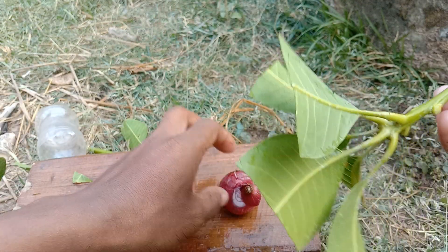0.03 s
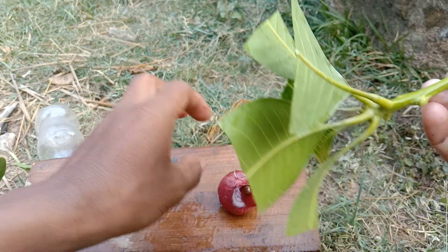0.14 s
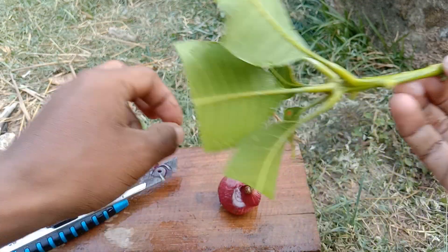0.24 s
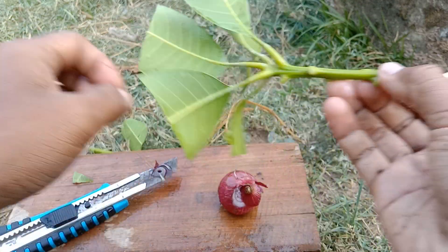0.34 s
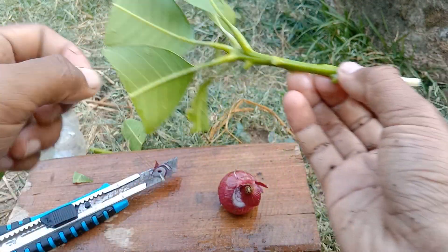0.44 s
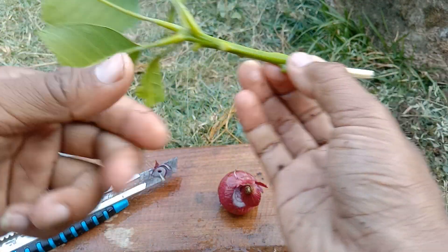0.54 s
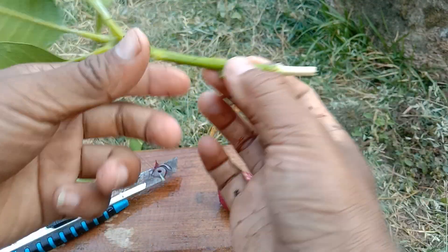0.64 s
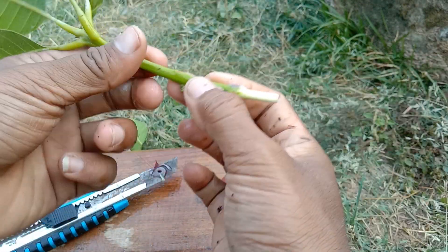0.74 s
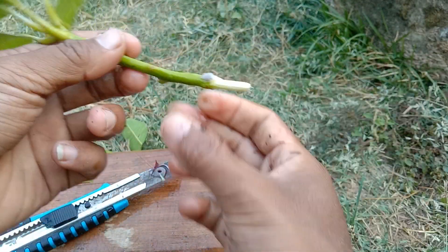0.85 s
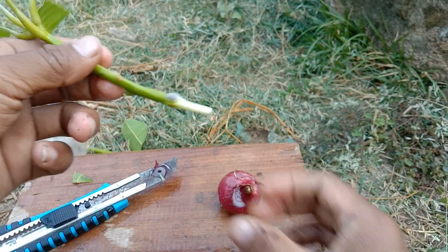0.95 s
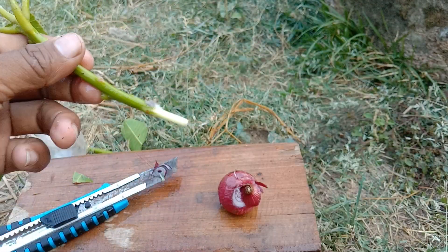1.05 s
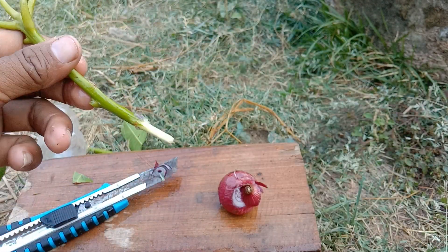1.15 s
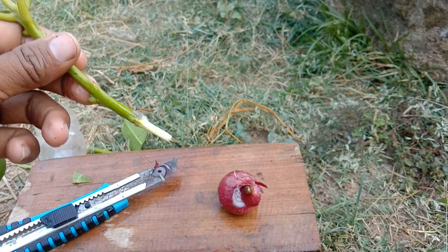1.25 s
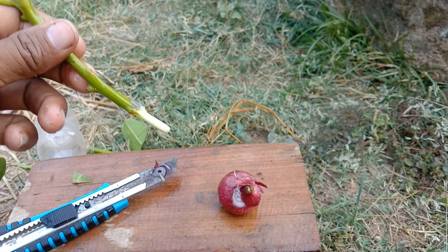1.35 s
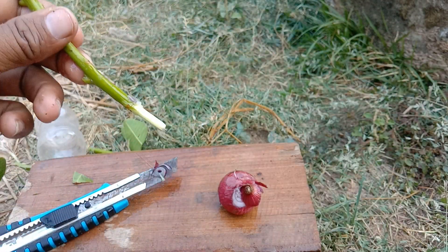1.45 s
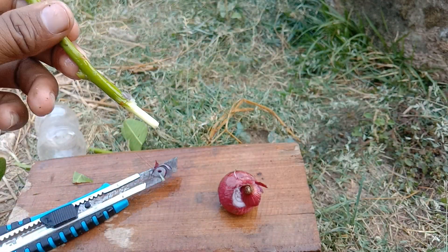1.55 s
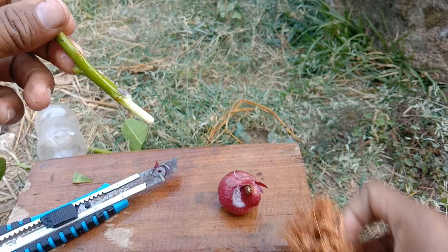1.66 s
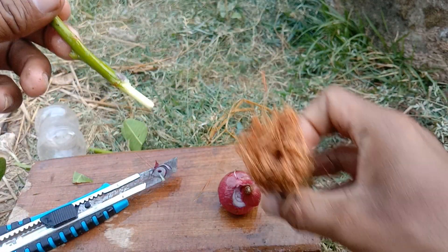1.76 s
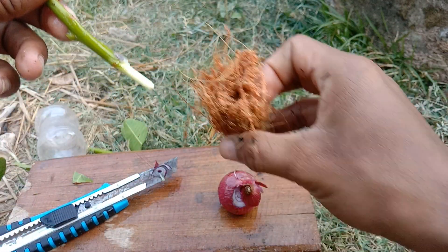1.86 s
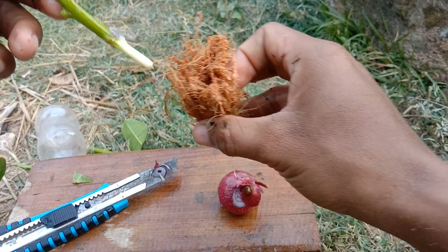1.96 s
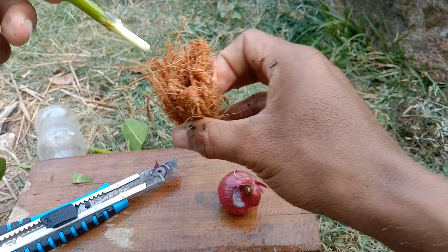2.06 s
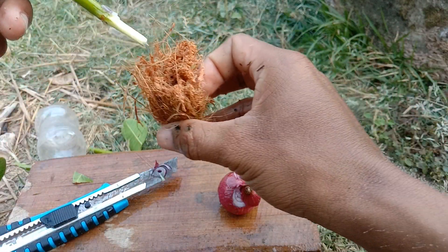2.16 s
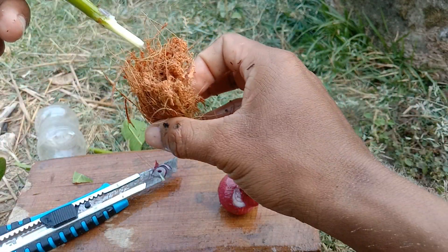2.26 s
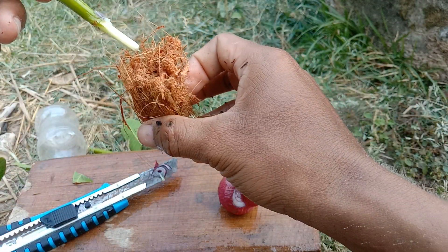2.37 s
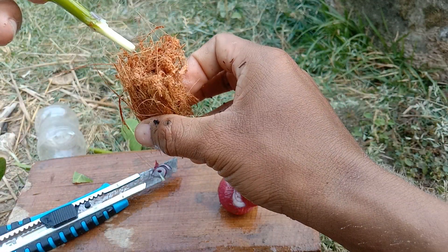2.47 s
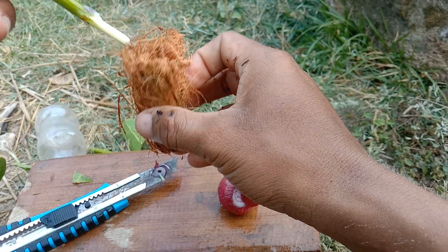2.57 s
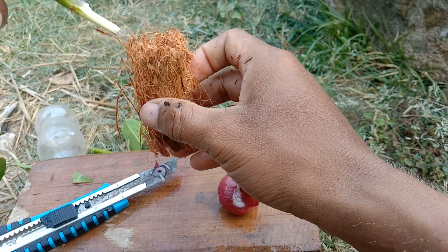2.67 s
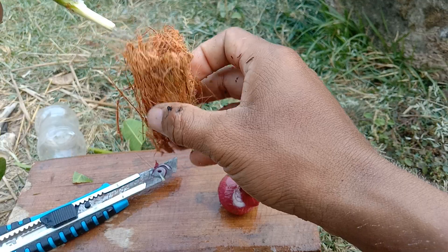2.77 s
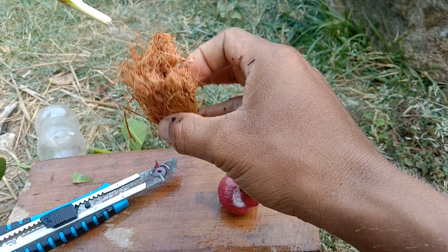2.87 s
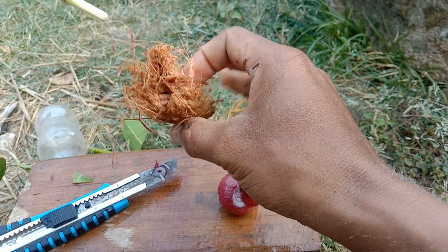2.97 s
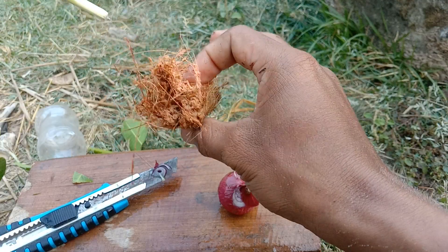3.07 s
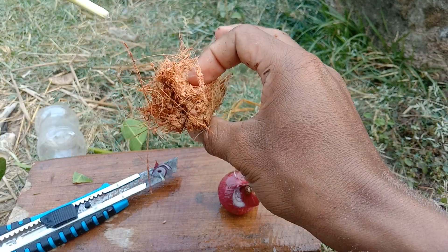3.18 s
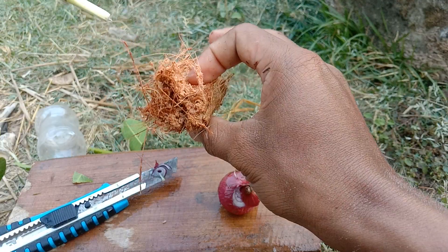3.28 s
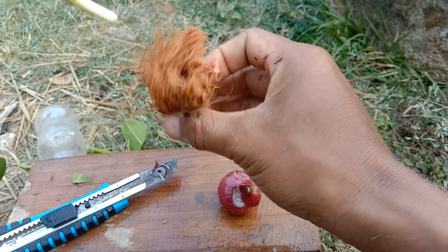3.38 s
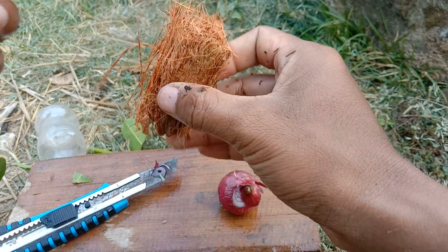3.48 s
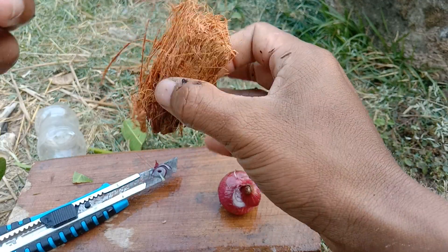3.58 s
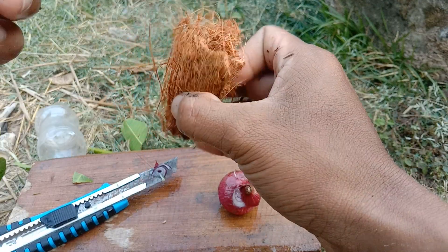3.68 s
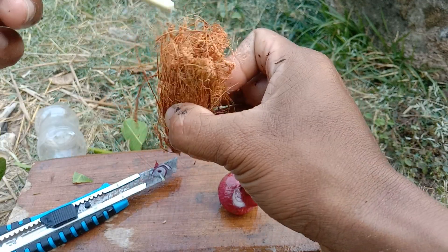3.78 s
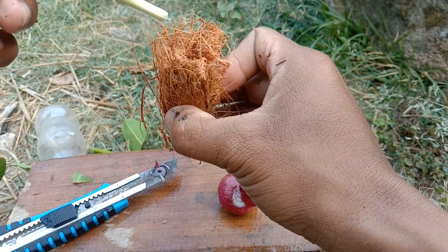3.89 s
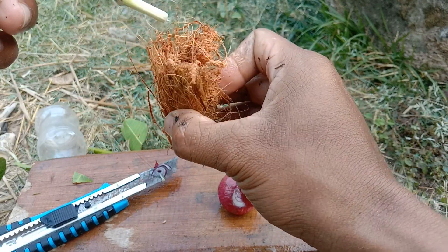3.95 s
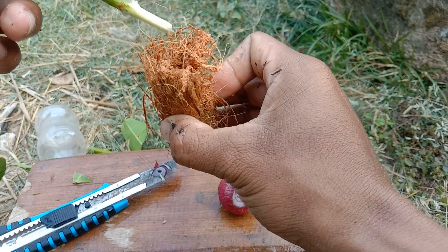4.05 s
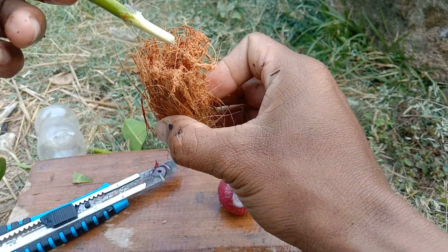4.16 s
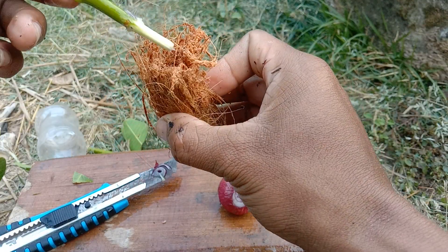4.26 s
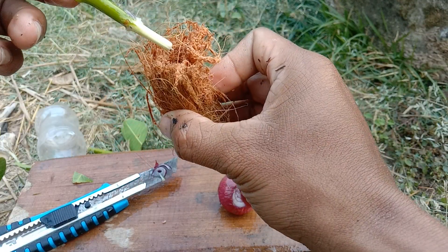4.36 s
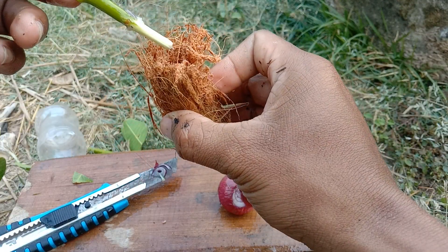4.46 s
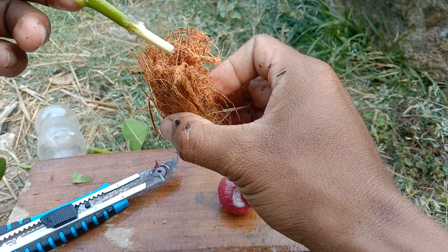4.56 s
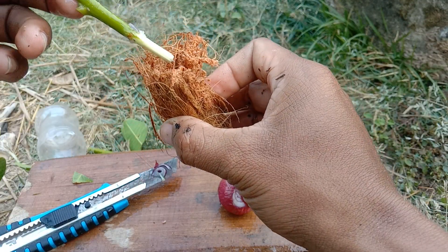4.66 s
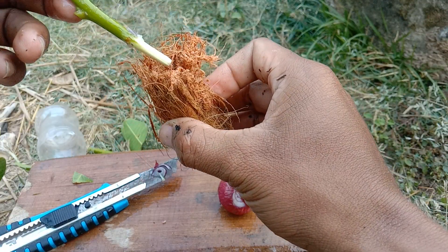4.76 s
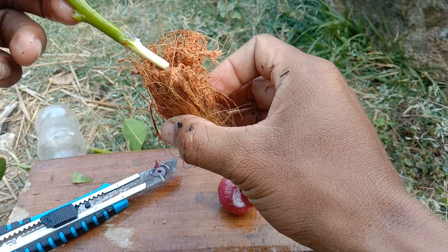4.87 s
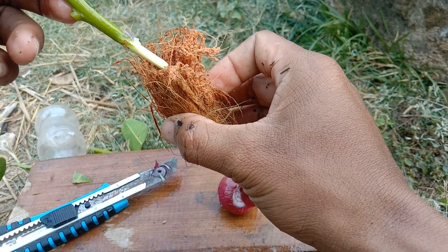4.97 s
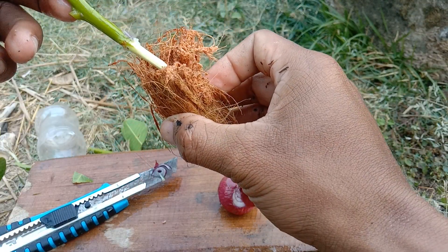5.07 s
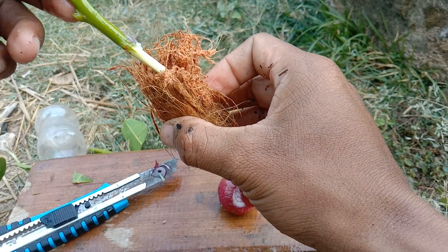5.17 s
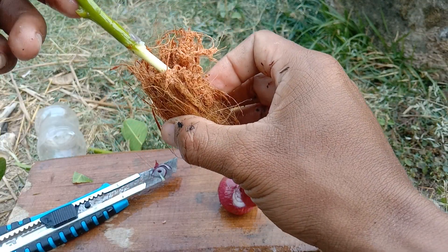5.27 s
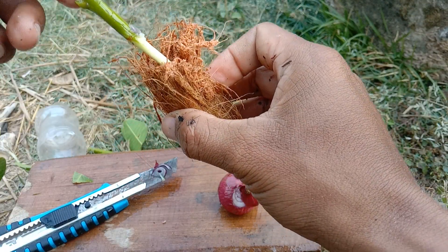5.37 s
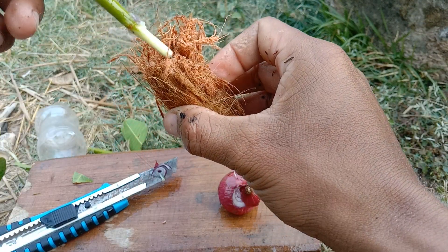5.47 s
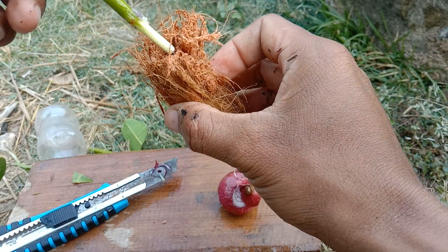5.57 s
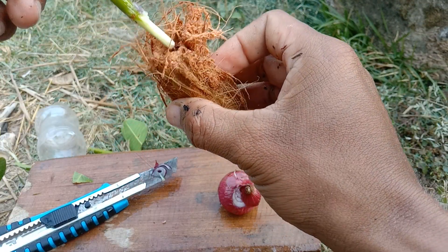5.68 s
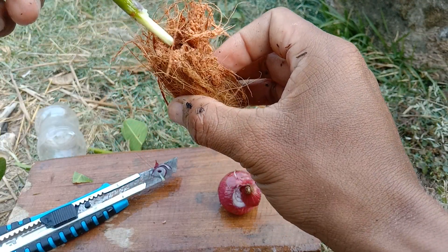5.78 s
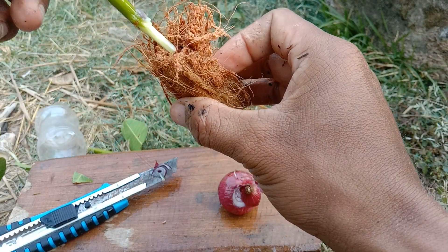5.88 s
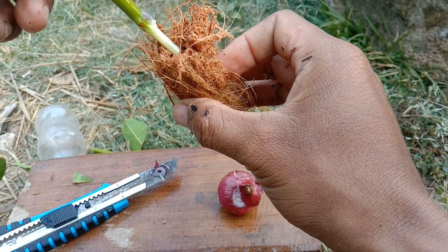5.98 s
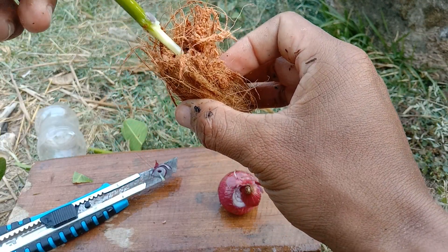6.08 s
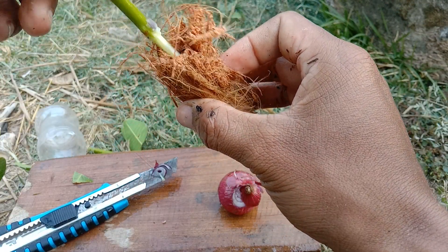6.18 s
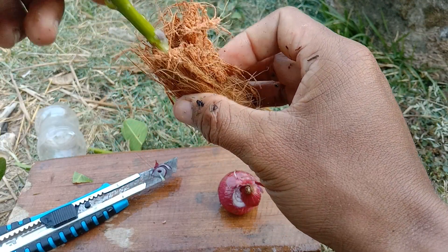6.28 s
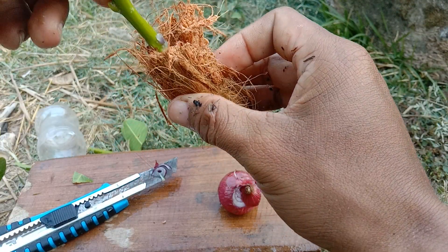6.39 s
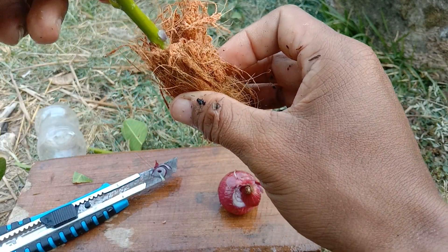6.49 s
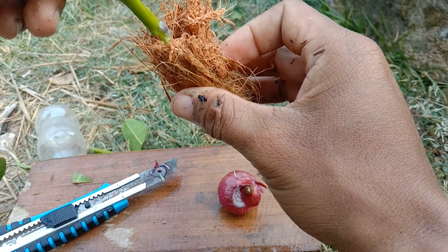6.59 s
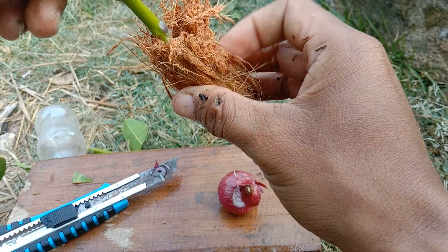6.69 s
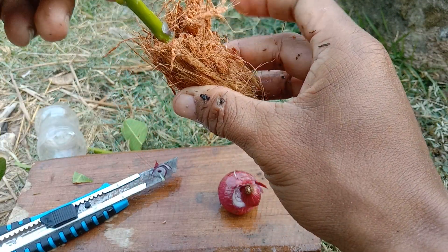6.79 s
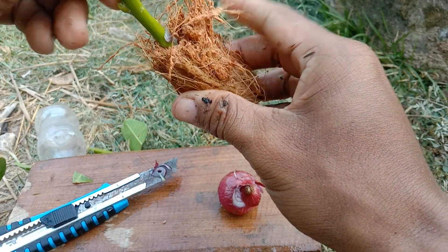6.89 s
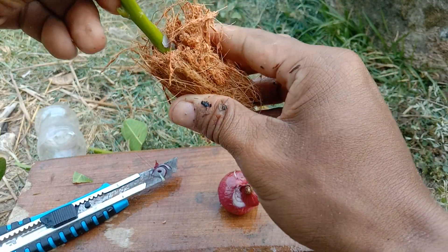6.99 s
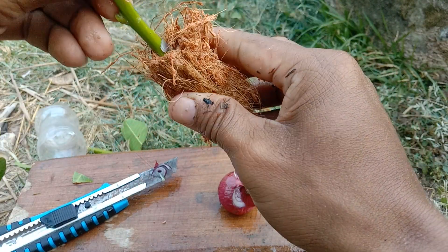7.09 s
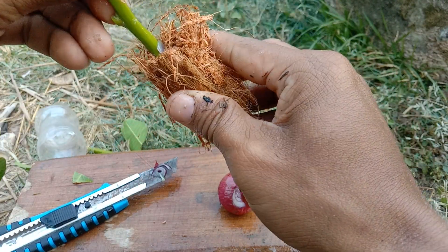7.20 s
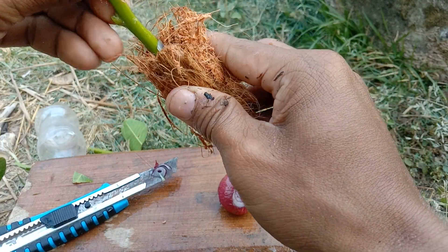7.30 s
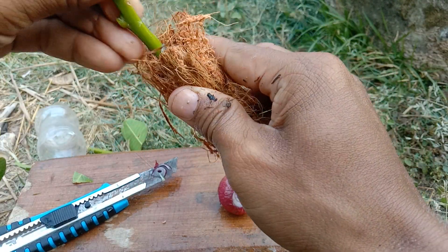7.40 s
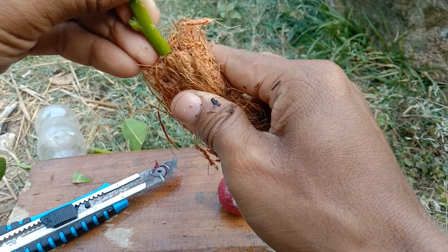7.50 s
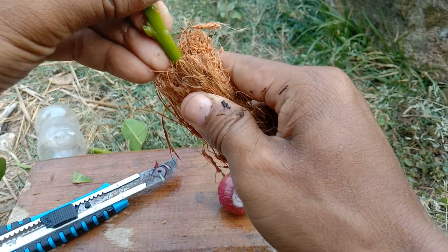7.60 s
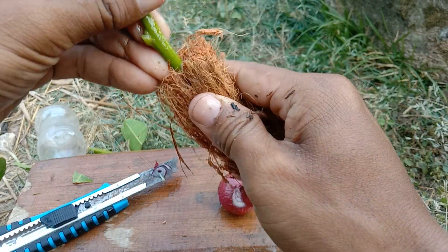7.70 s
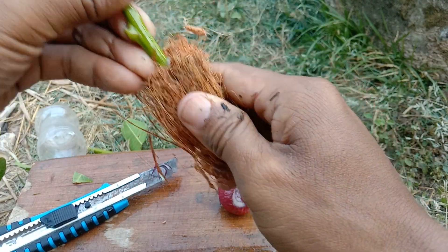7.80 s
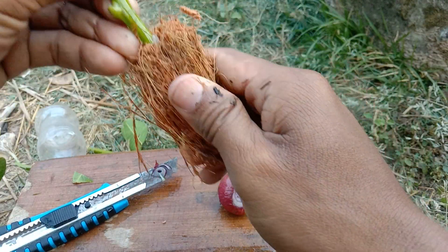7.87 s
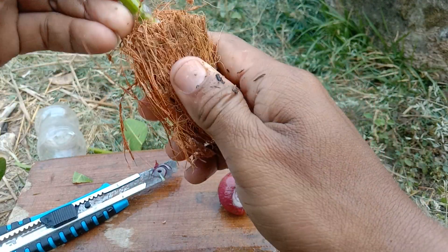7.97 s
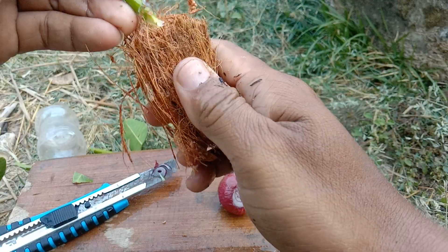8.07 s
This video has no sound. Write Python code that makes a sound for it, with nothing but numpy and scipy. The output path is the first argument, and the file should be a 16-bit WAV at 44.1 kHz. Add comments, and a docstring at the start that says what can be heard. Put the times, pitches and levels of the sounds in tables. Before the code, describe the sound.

A close microphone outdoors catches light ticks of stem and dry fibre over distant, echoing birds and a faint insect trill. Two faint hollow knocks and one brief nasal call come early. A deep road rumble builds unevenly, then hiss and tyre roar join it while fibre scrapes and crackles in short strokes, with low pushes and a loud raspy chirp near the end.

```python
"""A low rumble, like a vehicle on a nearby road, swells from almost nothing: coloured noise under level curves.
Outdoors, hands work a green stem into a wad of dry coconut fibre: grains scrape and crackle,
noise bursts snap, low noise bumps. Birds rasp, whistle and call nasally with swept sines and diffuse echo.
A far insect trills, faint hollow knocks ring; a broad mottled hiss of road and fibre rises sharply near 5.5 s."""
import sys
import numpy as np
from scipy import signal
from scipy.fft import rfft, irfft, next_fast_len
from scipy.io import wavfile
from scipy.ndimage import map_coordinates

SR = 44100
rng = np.random.default_rng(int(sys.argv[2]) if len(sys.argv) > 2 else 0)


def unload_wav(signal):
    """Save mono or channel-first audio to the path in sys.argv[1] as 16-bit WAV at rate SR, clipped to [-1, 1]."""
    wavfile.write(
        sys.argv[1],
        SR,
        np.round(np.clip(np.atleast_2d(signal).T, -1, 1) * 32767).astype(np.int16),
    )


N = 358971
TOP_HZ = 15600  # upper band limit

# Harsh falling chirps, some broken off early. Each row: start in seconds, length in seconds, level in dB.
RASPS = [(-.038, 0.11, -47.5), (0.403, 0.12, -71), (1.03, 0.075, -59), (1.127, 0.075, -63.5),
         (2.223, 0.12, -68.5), (3.161, 0.13, -64), (3.351, 0.076, -60.5), (3.687, 0.13, -62),
         (3.764, 0.15, -59.5), (4.128, .06, -65.5), (4.324, .125, -47), (4.712, 0.086, -56.5),
         (5.156, 0.16, -58), (5.739, 0.14, -53), (7.266, 0.17, -41)]
# Course of one chirp. Each row: seconds after its start, pitch in Hz, relative level in dB.
RASP_COURSE = [(0, 4830, -10), (.03, 5440, 1), (.068, 4390, -6.5), (.113, 2950, -3.5), (.125, 2880, -23)]
# Fainter birds are further off and have more echo.
RASP_NEAR_DB, RASP_NEAR_ECHO_SHARE, RASP_ECHO_SHARE_PER_DB = -52.5, 0.59, 0.7

# Engine rumble. Each row: time in seconds, level in dB.
RUMBLE_LEVEL = [(0, -76.5), (1.46, -72), (1.52, -62.5), (2.2, -50), (2.36, -55.5), (2.68, -46.5),
                (3.15, -54.5), (4.0, -45), (5.12, -42), (5.24, -36), (6.45, -32), (6.6, -35), (6.83, -31),
                (7.18, -33), (7.6, -29.5), (8.14, -32.5)]
# Low middle of the vehicle. Each row: time in seconds, level in dB.
BODY_LEVEL = [(0, -90), (1.4, -77.5), (3.2, -62.5), (3.9, -56), (5.1, -51.5), (5.6, -43), (8.14, -40)]
# Tyre roar. Each row: time in seconds, level in dB.
ROAR_LEVEL = [(0.0, -85.5), (1.4, -81.5), (2.3, -66), (2.8, -64), (3.78, -57.5), (3.83, -52.5),
              (4.35, -54.5), (4.87, -62.5), (5.35, -50.5), (6.979, -41), (7.03, -36.5), (7.23, -43),
              (7.41, -38.5), (8.14, -41)]
# Rumble spectrum. Each row: frequency in Hz, relative density in dB per Hz.
RUMBLE_SPECTRUM = [(20, -37), (60, -11), (88, 0), (180, -0.5), (262, -0.5), (305, -14), (400, -52)]
# Low-middle spectrum. Each row: frequency in Hz, relative density in dB per Hz.
BODY_SPECTRUM = [(230, -6.5), (310, 1), (500, -2), (650, -9.5), (950, -42)]
# Tyre spectrum. Each row: frequency in Hz, relative density in dB per Hz.
ROAR_SPECTRUM = [(450, -5), (740, 6), (1080, -1), (1300, 2), (1600, -3), (1900, -15.5), (2400, -27),
                 (3300, -22), (5000, -70)]
# Single wavering notes: two faint early, three stronger as the vehicle nears.
# Each row: peak time in seconds, width in seconds, middle pitch in Hz, peak level in dB.
DRONES = [(.62, .06, 511, -78), (.5, .22, 2200, -83), (7.68, .2, 177, -33), (7.53, .12, 148, -35),
          (7.05, .05, 890, -44)]
# Brief dips of the rumble. Each entry: centre in seconds.
LULLS_S = [1.871, 2.279, 3.025, 3.52, 3.74, 5.381]
LULL_WIDTH_S, LULL_DEPTH_DB = 0.024, 8

# Broad hiss of road and handled fibre. Each row: time in seconds, level in dB.
HISS_LEVEL = [(0, -92.5), (3.6, -79), (5.0, -74.5), (5.45, -67.5), (5.6, -57), (6.6, -56), (7.2, -52),
              (8.1, -51)]
# Hiss spectrum. Each row: frequency in Hz, relative density in dB per Hz.
HISS_SPECTRUM = [(1200, -12.5), (1900, 0), (3400, -1.5), (4200, -14), (5000, -3), (5700, 0), (6400, -10.5),
                 (9500, -35), (15500, -34)]

# Far insect. Each row: time in seconds, level in dB before the chirp shaping, middle pitch in Hz.
INSECT = [(0, -90, 6830), (1.2, -87, 6800), (1.55, -79, 6600), (2, -82, 6850), (3, -104, 6700)]
INSECT_CHIRPS_PER_S = 6.5  # mean rate

# Strokes over the fibre. Each row: peak time in seconds, width in seconds, scrape level in dB,
# bright crackle in dB relative to the scrape.
STROKES = [(3.424, 0.032, -62, -7), (3.572, 0.013, -74, 12), (3.84, 0.048, -67.5, -14),
           (5.586, 0.023, -54, -25), (5.78, 0.03, -60.5, -29), (6.17, 0.062, -57, -28),
           (6.335, 0.03, -56, -23), (6.52, 0.043, -72, -17), (6.7, 0.015, -60.5, -18),
           (6.855, 0.03, -56.5, -25), (7.026, 0.023, -46.5, -19), (7.14, 0.033, -59.5, -17),
           (7.3, .02, -59, -15), (7.49, 0.037, -53.5, -18), (7.64, 0.04, -64, -21), (7.9, 0.05, -54, -12),
           (8.05, 0.028, -54.5, -17)]
# Scrape spectrum. Each row: frequency in Hz, relative density in dB per Hz.
SCRAPE_SPECTRUM = [(1500, -11), (2800, 8.5), (4200, 2.5), (5200, 10.5), (6500, 3.5), (8200, -5),
                   (10000, -24.5), (15500, -28)]
# Crackle spectrum. Each row: frequency in Hz, relative density in dB per Hz.
CRACKLE_SPECTRUM = [(4000, 6), (7000, 23), (15500, 3)]
RESTING_DB = -13  # faint creak between strokes, relative to the hiss
SMEAR_T60_S, SMEAR_POWER_SHARE = 0.028, 0.38  # short noisy smear of fibre and snaps

# Snaps of stem and fibre. Each row: start in seconds, peak in dB before the smear, centre in Hz.
SNAPS = [(.546, -54.5, 3900), (0.671, -48, 2970), (.672, -51, 7240), (1.114, -41.5, 8000),
         (2.774, -55.5, 7900), (3.558, -43.5, 12200), (3.57, -45, 7850), (4.298, -40.5, 13530),
         (5.003, -48, 3670), (5.576, -38, 4800), (6.057, -37, 6500), (6.155, -34, 6800), (6.322, -52, 8500),
         (6.473, -54.5, 14000), (6.548, -50, 7360), (6.886, -55, 7600), (6.99, -46, 12100),
         (7.024, -47, 8450), (7.036, -46, 10500), (7.104, -53, 10000), (7.703, -41, 6600),
         (7.954, -42.5, 13600)]
SNAP_RISE_S, SNAP_T60_S = 0.00018, 0.0041
SNAP_HALF_WIDTH = 0.13  # half bandwidth over centre

# Whistled notes that slide down. Each row: start in seconds, length in seconds, middle pitch in Hz, level in dB.
SLURS = [(0.58, 0.047, 4020, -77), (0.614, 0.062, 3570, -71), (0.683, 0.046, 3240, -72.5),
         (0.866, 0.071, 3940, -82.5), (0.904, 0.069, 3240, -65.5), (1.089, 0.062, 2980, -66.5),
         (2.619, 0.076, 3550, -64), (2.774, 0.041, 2895, -61), (3.083, 0.048, 3210, -59.5),
         (6.902, 0.047, 3300, -51), (7.042, 0.12, 3540, -51)]
SLUR_FALL_OCT = 0.14
# Whistled arches. Each row: start in seconds, length in seconds, first, middle and last pitch in Hz, level in dB.
ARCHES = [(1.156, 0.109, 2870, 3640, 3410, -63.5), (1.403, 0.13, 3060, 3520, 2940, -68.5),
          (2.25, 0.091, 3050, 3760, 3140, -66.5), (2.275, .19, 4090, 4230, 3750, -68.5),
          (2.565, 0.043, 4280, 4420, 3950, -65.5), (2.872, 0.029, 2710, 3100, 2980, -63),
          (3.132, 0.093, 2940, 3560, 3260, -57.5), (5.715, 0.111, 3750, 3680, 3580, -54),
          (6.64, 0.11, 4720, 5110, 4970, -58), (6.74, 0.11, 3750, 4100, 3780, -58.5),
          (7.6, 0.091, 3100, 3310, 3240, -49)]
WHISTLE_ECHO_SHARE, WHISTLE_T60_S = 0.42, 0.48  # share of power
ECHO_BUILD_S = 0.0043  # time constant of the echo's build-up

# Faint hollow knocks. Each row: start in seconds, level in dB, decay t60 in seconds.
KNOCKS = [(0.923, -65.5, 0.31), (1.162, -61, 0.058)]
# Knock partials. Each row: middle frequency in Hz, relative level in dB.
KNOCK_PARTIALS = [(1090, -2), (1290, 0), (1530, -4)]

# One near nasal call. Each row: time in seconds, pitch in Hz, level in dB.
NASAL = [(1.901, 1050, -66), (1.917, 1274, -54.5), (1.984, 1160, -58.5), (2.012, 1080, -71)]
# Its partials. Each row: multiple of the pitch, middle relative level in dB.
NASAL_PARTIALS = [(2, -17), (3, 4), (4, -11), (5, -9.5), (6, -25)]

# Dull handling bumps. Each row: peak time in seconds, width in seconds, level in dB.
BUMPS = [(6.33, 0.0081, -25.5), (6.366, 0.019, -29.5), (6.47, 0.057, -32.5)]
# Bump spectrum. Each row: frequency in Hz, relative density in dB per Hz.
BUMP_SPECTRUM = [(160, -17), (230, 0.5), (500, -18)]


def amp(db):
    """Decibels to gain."""
    return 10 ** (np.asarray(db) / 20)


def unit(x):
    """Scale to rms 1."""
    return x / np.sqrt(np.mean(x ** 2) + 1e-20)


def clock(length_s):
    """Sample times over a length."""
    return np.arange(int(length_s * SR)) / SR


def curves(rows, t):
    """Each column after the time, interpolated at the times t."""
    s, *cols = np.transpose(rows)
    return [np.interp(t, s, c) for c in cols]


def bell(t, s, width_s):
    """Gaussian rise and fall that peaks at time s."""
    return np.exp(-.5 * ((t - s) / width_s) ** 2)


def wobble(knots_per_s, size=N):
    """Smooth random curve."""
    knots = rng.standard_normal(int(size * knots_per_s / SR) + 4)
    return map_coordinates(knots, [np.arange(size) * knots_per_s / SR])


def filtered(x, response):
    """Multiply the spectrum of x by a response of frequency."""
    m = next_fast_len(len(x) + 8192)
    return irfft(rfft(x, m) * response(np.fft.rfftfreq(m, 1 / SR)), m)[:len(x)]


def coloured(x, spectrum):
    """Shape x by a (Hz, dB) spectrum, at rms 1."""
    f, db = np.transpose(spectrum)

    def response(hz):
        return amp(np.interp(np.log(hz + 1), np.log(f), db, left=-120, right=-120))

    return unit(filtered(x, response))


def mottled(x, depth_db, size_bins=8):
    """Random gain patches over time and frequency come and go."""
    z = signal.stft(x, nperseg=1024)[2]
    patch = np.outer(np.hanning(size_bins), np.hanning(7))
    field = signal.fftconvolve(rng.standard_normal(z.shape), patch, "same")
    return signal.istft(z * amp(depth_db * unit(field)), nperseg=1024)[1][:N]


def rush(spectrum, depth_db, size_bins=8):
    """Coloured noise with drifting patches of gain."""
    return coloured(mottled(rng.standard_normal(N), depth_db, size_bins), spectrum)


def tone(hz):
    """Sine at rms 1 that follows a pitch curve."""
    return np.sqrt(2) * np.sin(2 * np.pi * np.cumsum(hz) / SR)


def add(track, s, sound):
    """Mix a sound into the track at time s, cut at the track's ends."""
    i = round(s * SR)
    part = sound[max(-i, 0):len(track) - i]
    track[max(i, 0):max(i, 0) + len(part)] += part


def trees(x, t60_s):
    """Diffuse echo from leaves, trunks and walls; it builds up as the paths multiply."""
    t = clock(.5)
    tail = rng.standard_normal(len(t)) * amp(-60 * t / t60_s) * (1 - np.exp(-t / ECHO_BUILD_S))
    return signal.fftconvolve(x, tail / np.linalg.norm(tail))


def add_call(track, s, call, echo_share, t60_s):
    """Mix in a call and its echo, which takes the given share of the power."""
    add(track, s, np.sqrt(1 - echo_share) * call)
    add(track, s, np.sqrt(echo_share) * trees(call, t60_s))


def raspers():
    """A falling sweep, torn into a harsh band by fast irregular flutter of pitch and level."""
    out = np.zeros(N)
    throat = signal.butter(6, [2700, 6100], "band", fs=SR, output="sos")
    for s, length_s, db in RASPS:
        t = clock(length_s)
        hz, shape_db = curves(RASP_COURSE, t)
        distance_db = max(RASP_NEAR_DB - db, 0)
        echo_share = min(RASP_NEAR_ECHO_SHARE + RASP_ECHO_SHARE_PER_DB * distance_db, 1)
        voice = tone(hz + 220 * wobble(1100, len(t))) * amp(3 * wobble(600, len(t)))
        voice = unit(signal.sosfilt(throat, voice)) * signal.windows.tukey(len(t), .22)
        t60_s = 0.49 * np.sqrt(echo_share)  # far birds ring on longer
        add_call(out, s, amp(db + shape_db) * voice, echo_share, t60_s)
    return mottled(out, depth_db=3)


def vehicle(t):
    """Engine rumble and tyre roar grow as it nears; single wavering notes come and go."""
    rumble_db, body_db, roar_db = (curves(rows, t)[0] for rows in (RUMBLE_LEVEL, BODY_LEVEL, ROAR_LEVEL))
    rumble_db = rumble_db - LULL_DEPTH_DB * sum(bell(t, s, LULL_WIDTH_S) for s in LULLS_S)
    out = amp(rumble_db + 0.35 * wobble(10)) * rush(RUMBLE_SPECTRUM, depth_db=2.5)
    out += amp(body_db) * rush(BODY_SPECTRUM, depth_db=3.0)
    out += amp(roar_db + 0.82 * wobble(11)) * rush(ROAR_SPECTRUM, depth_db=3.0)
    for s, width_s, hz, db in DRONES:
        out += amp(db) * bell(t, s, width_s) * tone(hz + (2 + 0.0142 * hz) * wobble(40))
    return out


def broad_hiss(t):
    """Broad mottled noise of road and handled fibre, rising sharply near 5.5 s."""
    level_db = curves(HISS_LEVEL, t)[0] + 0.71 * wobble(9.7)
    return amp(level_db) * rush(HISS_SPECTRUM, depth_db=3, size_bins=11)


def microphone_hiss():
    """Faint steady white noise."""
    return amp(-89.0) * rng.standard_normal(N)


def insect(t):
    """A thin, shrill shimmer in separate, uneven chirps, heard only as echo through the trees."""
    db, hz = curves(INSECT, t)
    chirps = np.abs(np.sin(np.pi * INSECT_CHIRPS_PER_S * t + wobble(6.7))) ** 3
    shimmer = amp(db) * chirps * tone(hz * (1 + .02 * wobble(600)))
    return trees(shimmer, WHISTLE_T60_S / 2)[:N]


def grains(per_s, cycles):
    """Single strands flick at random: each rings for a few cycles at its own pitch and size."""
    when, pitch, chance = rng.random((int(per_s * N / SR), 3)).T
    hz = 1800 * (TOP_HZ / 1800) ** pitch[:, None]
    size = amp(-3.2 * np.log(.01 + chance))[:, None] * (hz / TOP_HZ) ** 1.5
    t = clock(.003)
    decay = np.exp(-2 * hz * t / cycles) * (1 - t / t[-1])
    rings = size * np.sin(2 * np.pi * hz * t) * decay
    places = (when * N).astype(int)[:, None] + np.arange(len(t))
    return np.bincount(places.ravel(), rings.ravel(), N)[:N]


def fibre(t):
    """Each stroke makes many strands scrape and a few break brightly; the held wad creaks in between."""
    scrape, crackle = amp(curves(HISS_LEVEL, t)[0] + RESTING_DB), np.zeros(N)
    for s, width_s, db, bright_db in STROKES:
        pressure = amp(db) * bell(t, s, width_s)
        scrape += pressure
        crackle += pressure * amp(bright_db)
    catch = amp(2.24 * wobble(70))  # strands catch and slip in clumps
    rubbed = coloured(mottled(grains(1500, cycles=10), depth_db=3.5, size_bins=13), SCRAPE_SPECTRUM)
    broken = coloured(mottled(grains(2000, cycles=5), depth_db=3, size_bins=13), CRACKLE_SPECTRUM)
    return catch * (scrape * rubbed + crackle * broken)


def smeared(x):
    """A short noisy smear softens fibre and snaps: part of the power passes through decaying noise."""
    t = clock(.03)
    tail = rng.standard_normal(len(t)) * amp(-60 * t / SMEAR_T60_S)
    smear = signal.fftconvolve(x, tail / np.linalg.norm(tail))[:N]
    return np.sqrt(1 - SMEAR_POWER_SHARE) * x + np.sqrt(SMEAR_POWER_SHARE) * smear


def snaps():
    """A stiff strand lets go: a short tick in a narrow band around its own centre, then a short shiver."""
    out, t = np.zeros(N), clock(.06)
    for s, db, centre_hz in SNAPS:
        decay = amp(-60 * t / SNAP_T60_S) + .07 * amp(-60 * t / .07)  # tick + shiver of its neighbours
        burst = rng.standard_normal(len(t)) * decay * (1 - np.exp(-t / SNAP_RISE_S))
        edges_hz = np.minimum(centre_hz * np.exp([-SNAP_HALF_WIDTH, SNAP_HALF_WIDTH]), TOP_HZ)
        tick = signal.sosfilt(signal.butter(2, edges_hz, "band", fs=SR, output="sos"), burst)
        add(out, s, amp(db) * tick / np.abs(tick).max())
    return out


def whistler():
    """Fluttering sine notes of two shapes, a falling slur and an arch, with echo from the trees."""
    out, half_fall = np.zeros(N), 2 ** (SLUR_FALL_OCT / 2)
    slurs = [(s, length_s, hz * half_fall, hz, hz / half_fall, db) for s, length_s, hz, db in SLURS]
    for s, length_s, first_hz, middle_hz, last_hz, db in slurs + list(ARCHES):
        u = clock(length_s) / length_s
        hz = np.polyval(np.polyfit([0, .5, 1], [first_hz, middle_hz, last_hz], 2), u)
        swell = np.sqrt(np.sin(np.pi * u)) * amp(db + 2.6 * wobble(119.5, len(u)))
        note = swell * tone(hz * (1 + .011 * wobble(280, len(u))))
        add_call(out, s, note, WHISTLE_ECHO_SHARE, WHISTLE_T60_S)
    return out


def knocks():
    """Something hollow is tapped further off: unsteady partials ring and die away."""
    out, t = np.zeros(N), clock(.3)
    for s, db, t60_s in KNOCKS:
        ring = sum(amp(level_db) * tone(hz * (1 + .04 * wobble(500, len(t)))) for hz, level_db in KNOCK_PARTIALS)
        envelope = amp(db - 60 * t / t60_s) * (1 - np.exp(-t / 0.0017))
        add_call(out, s, envelope * ring, echo_share=0.18, t60_s=0.2)
    return out


def nasal_bird():
    """A harmonic call whose third partial carries it; the weaker partials flicker."""
    out, start_s = np.zeros(N), NASAL[0][0]
    t = start_s + clock(NASAL[-1][0] - start_s)
    hz, db = curves(NASAL, t)
    hz = hz * (1 + .012 * wobble(700, len(t)))
    call = np.zeros(len(t))
    for multiple, level_db in NASAL_PARTIALS:
        flicker = 1 + .16 * wobble(70, len(t))  # scales the dB value
        call += amp(level_db * flicker) * tone(round(multiple) * hz)
    add_call(out, start_s, amp(db) * signal.windows.tukey(len(t), .1) * call, echo_share=.3, t60_s=.3)
    return out


def bumps(t):
    """Hands shove the stem home with a few dull, low pushes."""
    push = sum(amp(db) * bell(t, s, width_s) for s, width_s, db in BUMPS)
    return push * coloured(rng.standard_normal(N), BUMP_SPECTRUM)


def scene():
    """Road, birds, insect, hands and knocks at one microphone."""
    t = np.arange(N) / SR
    wildlife = raspers() + insect(t) + whistler() + nasal_bird()
    hands = smeared(fibre(t) + snaps()) + bumps(t)
    return (vehicle(t) + broad_hiss(t) + microphone_hiss() + wildlife + hands + knocks())[None]


def record(dry):
    """Remove everything from the band limit up."""
    return filtered(dry[0], lambda hz: hz < TOP_HZ)[None]


dry = scene()
out = record(dry)
unload_wav(out)
```